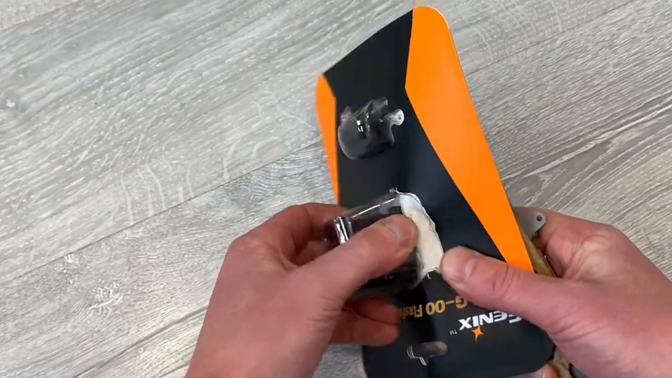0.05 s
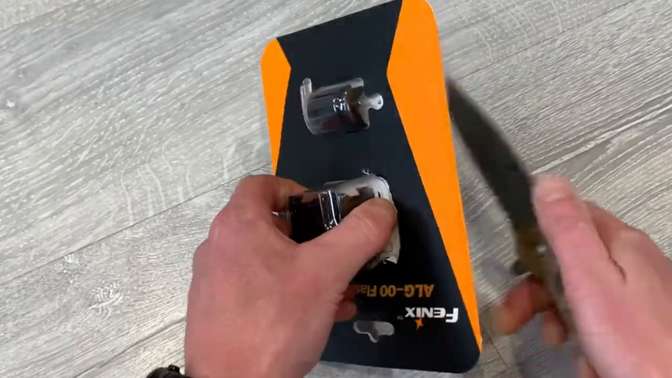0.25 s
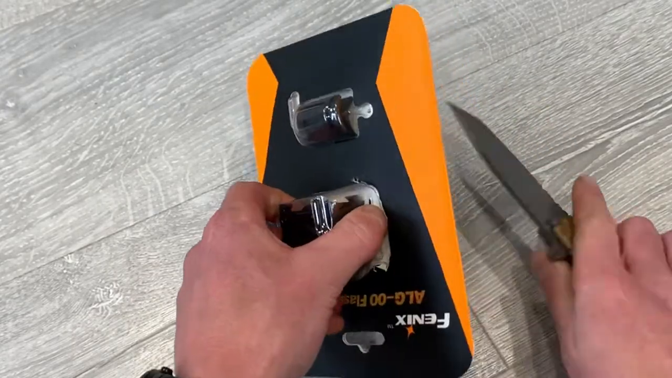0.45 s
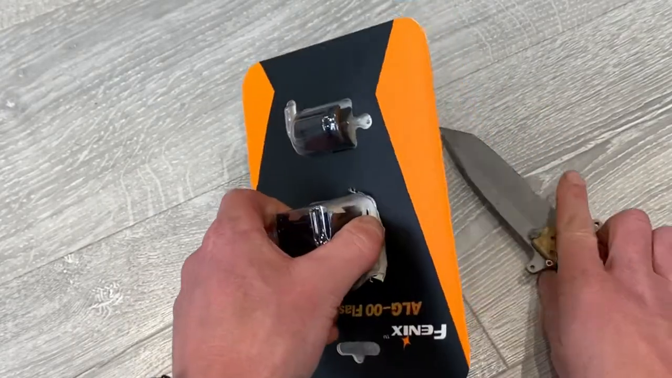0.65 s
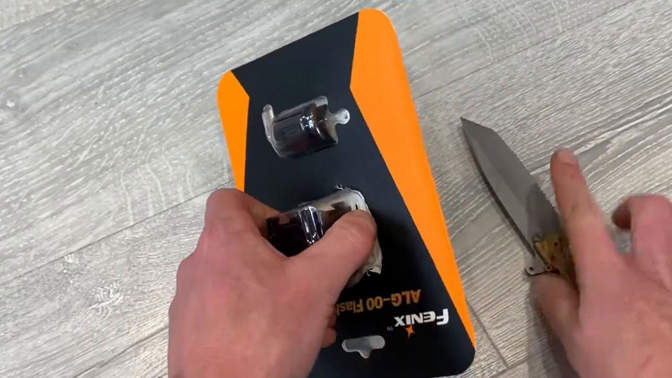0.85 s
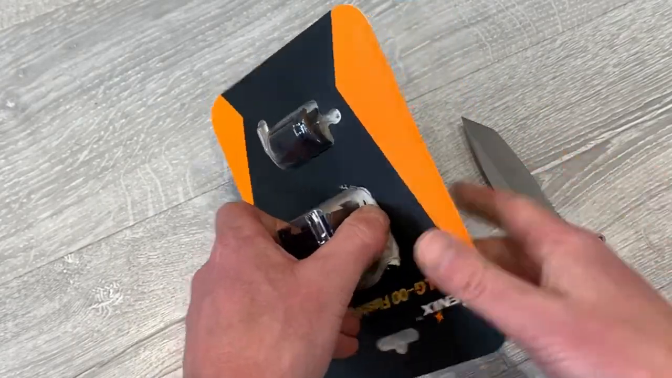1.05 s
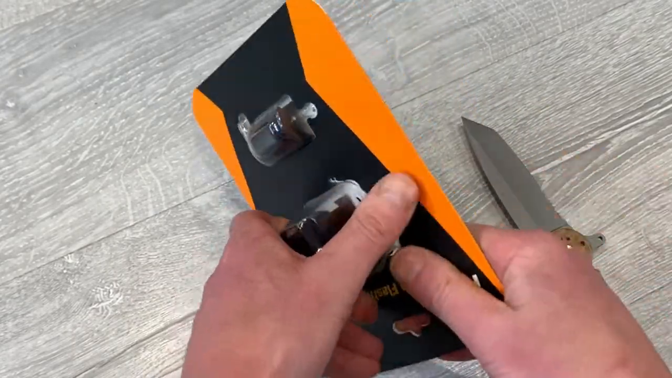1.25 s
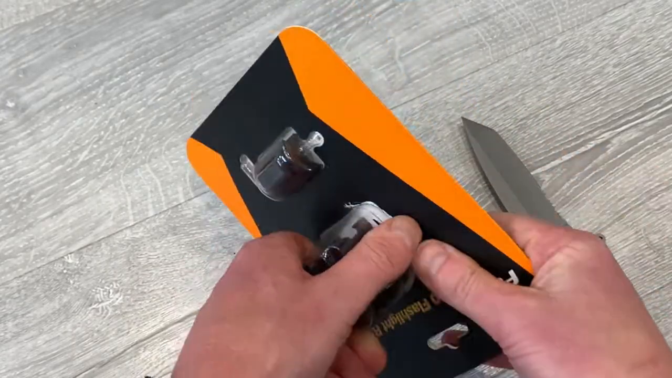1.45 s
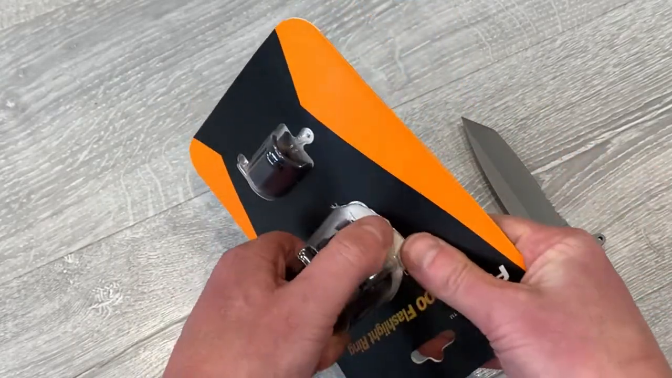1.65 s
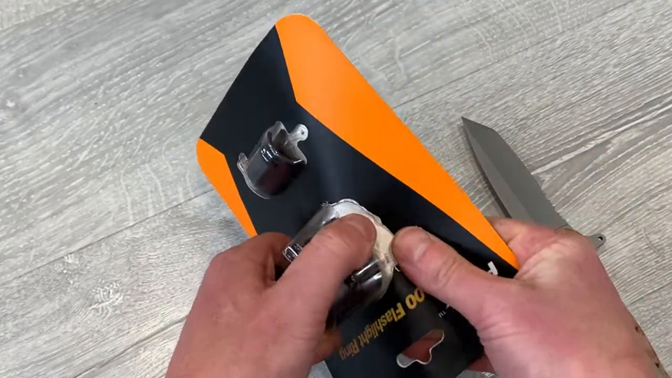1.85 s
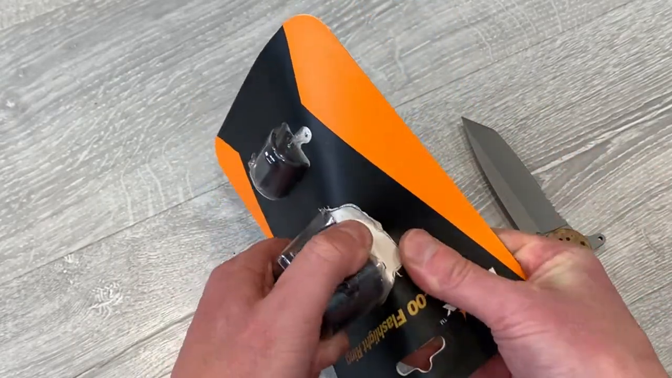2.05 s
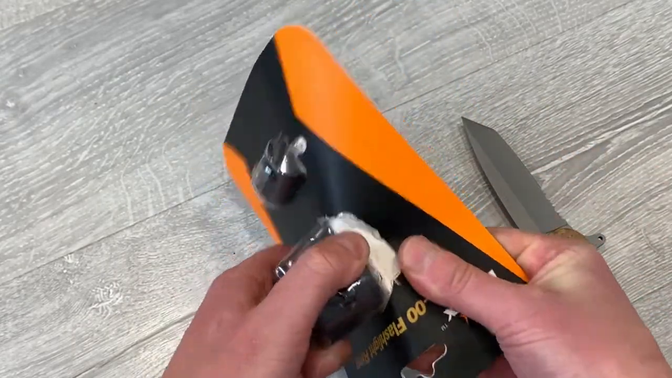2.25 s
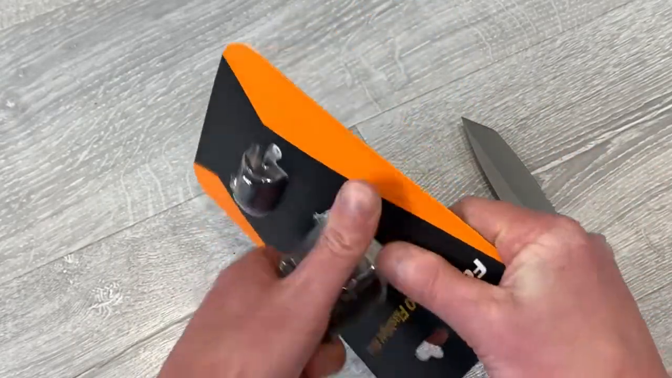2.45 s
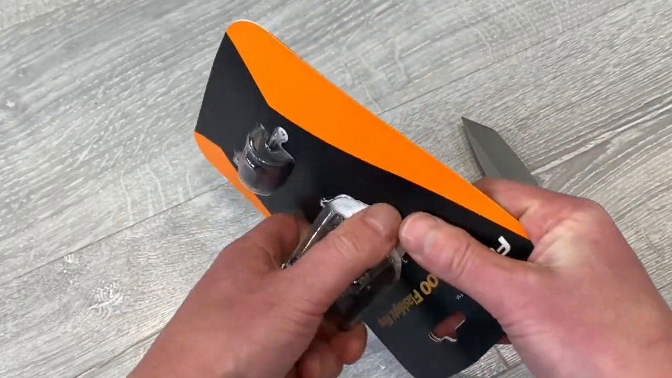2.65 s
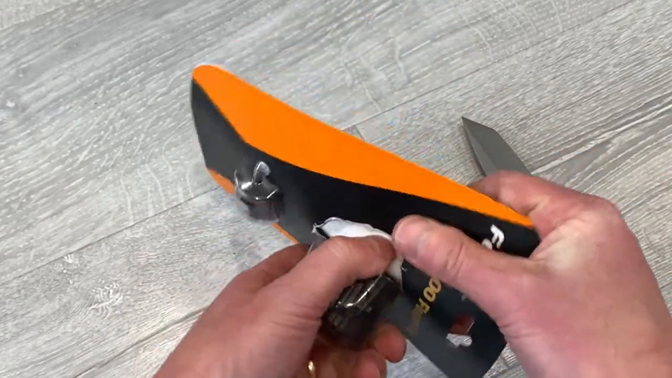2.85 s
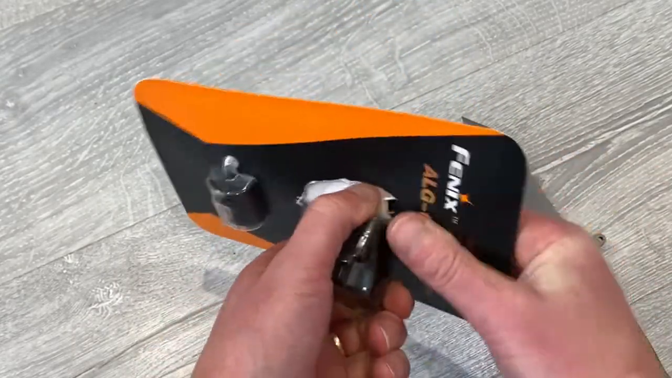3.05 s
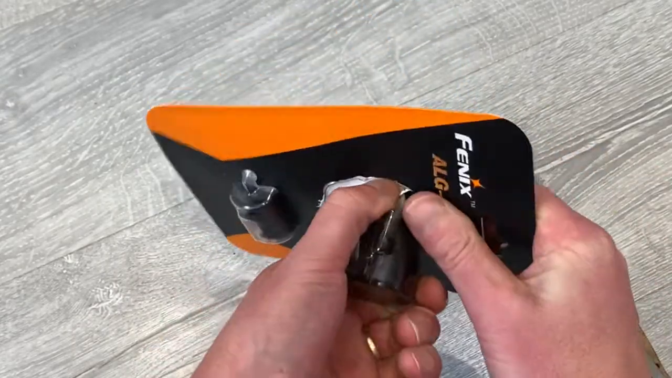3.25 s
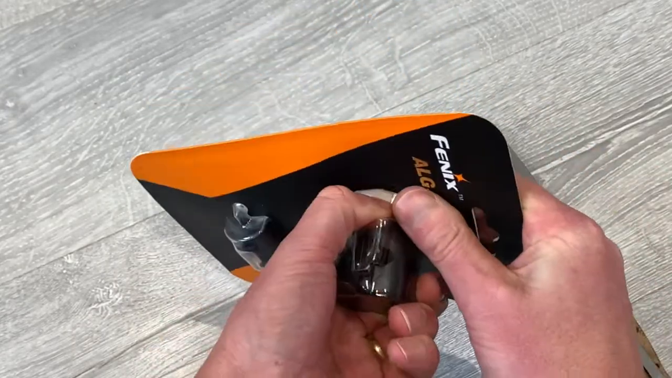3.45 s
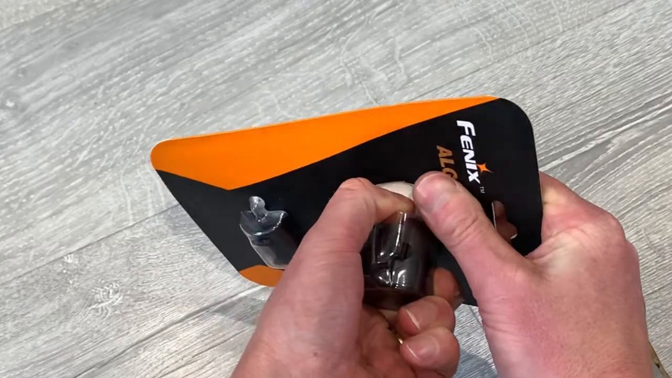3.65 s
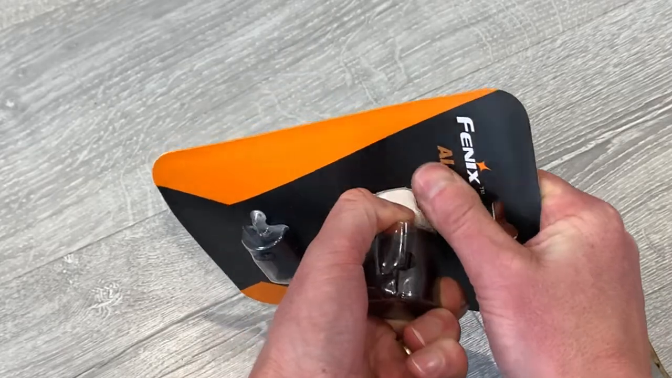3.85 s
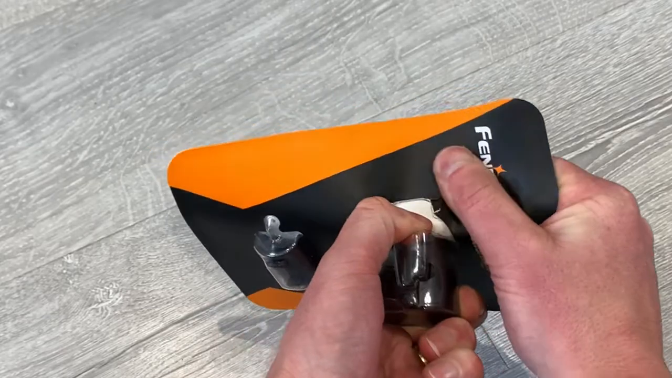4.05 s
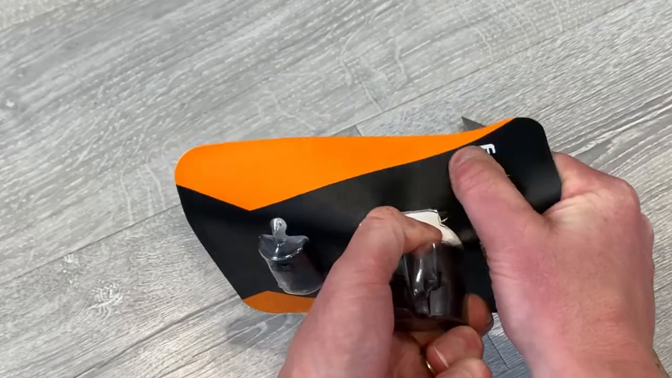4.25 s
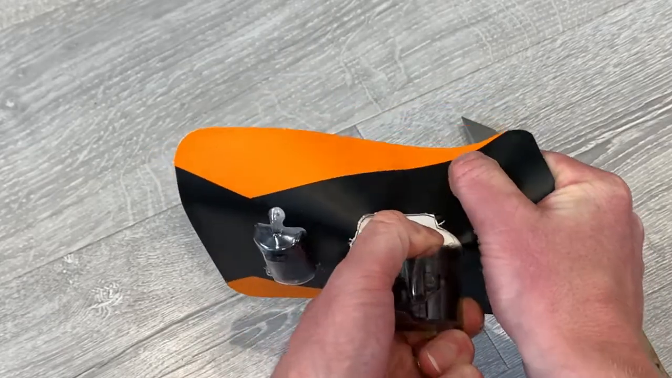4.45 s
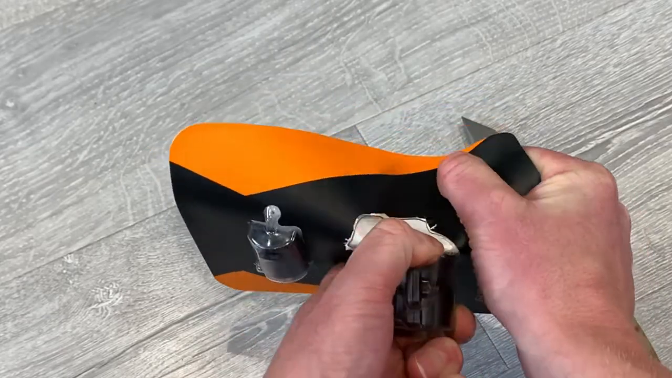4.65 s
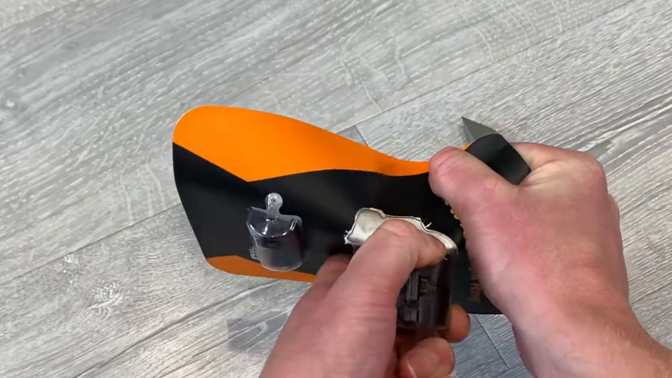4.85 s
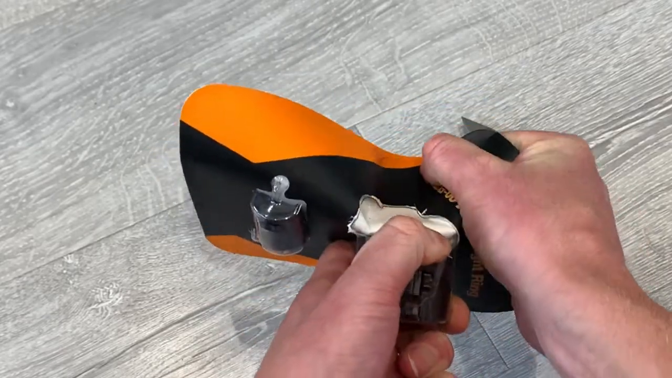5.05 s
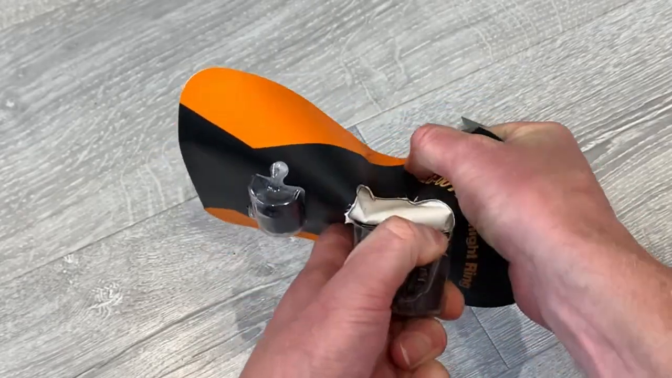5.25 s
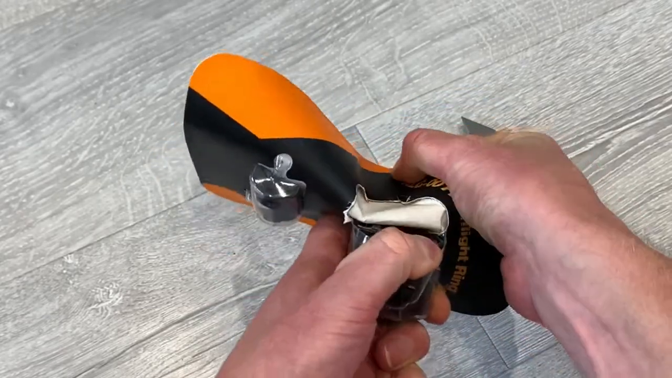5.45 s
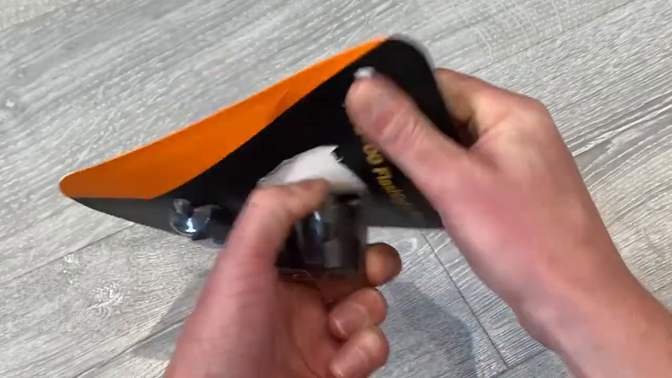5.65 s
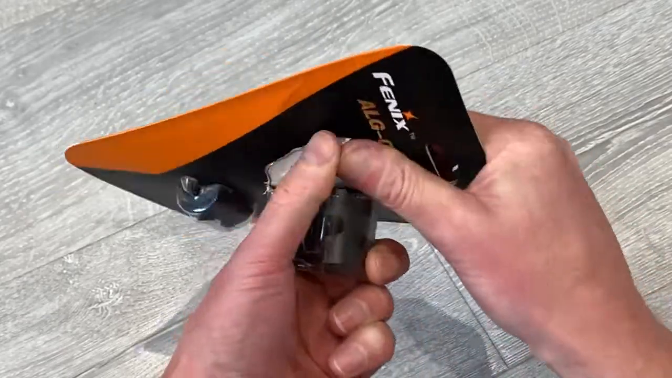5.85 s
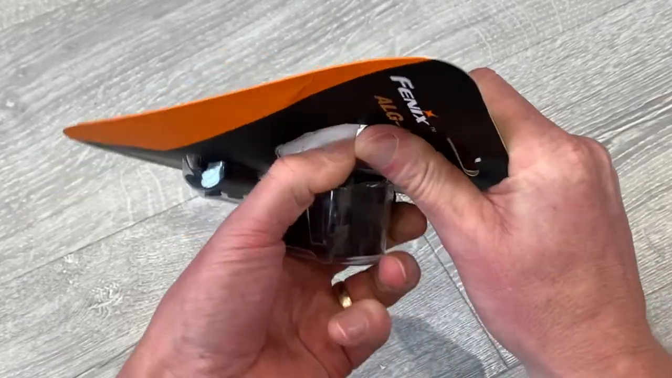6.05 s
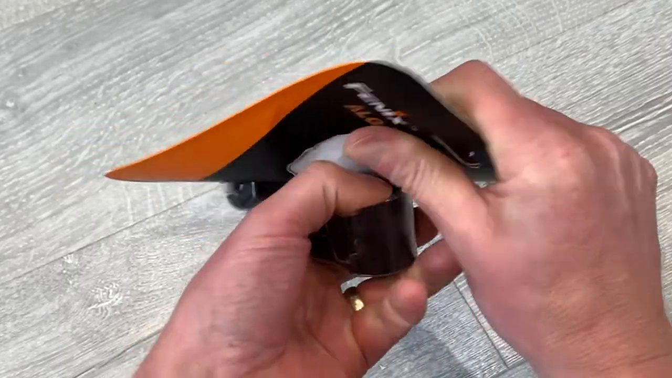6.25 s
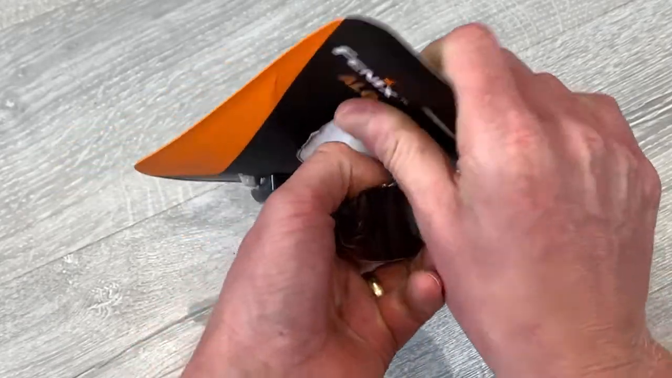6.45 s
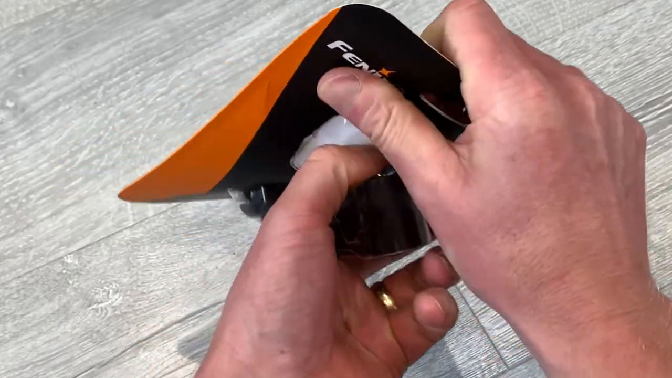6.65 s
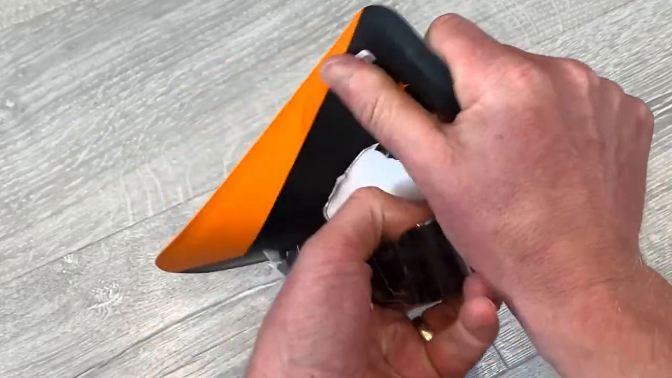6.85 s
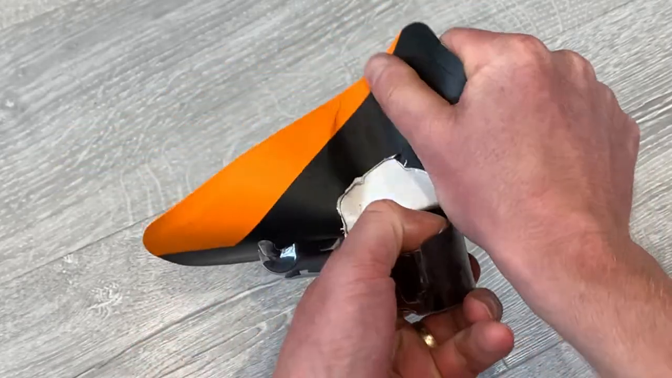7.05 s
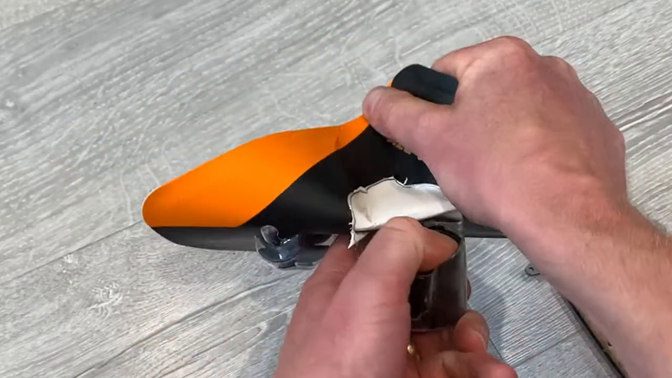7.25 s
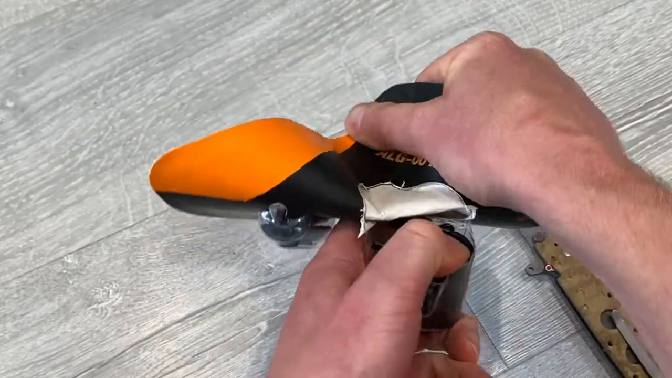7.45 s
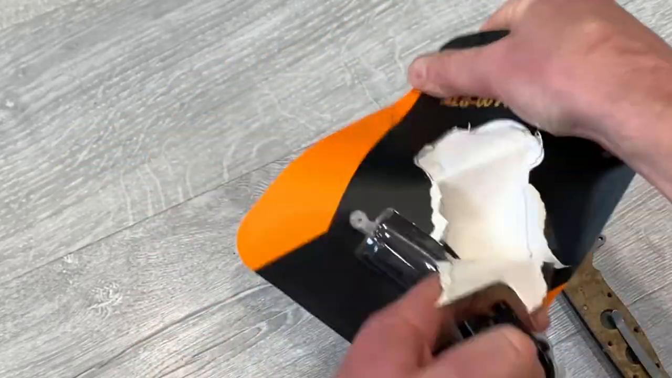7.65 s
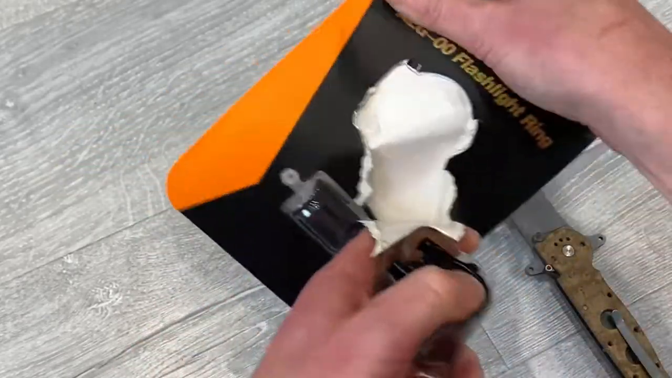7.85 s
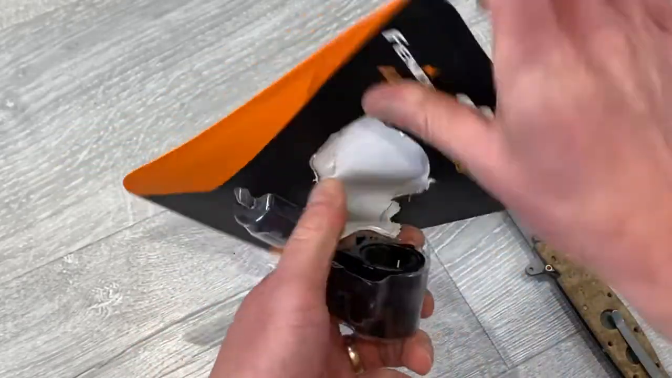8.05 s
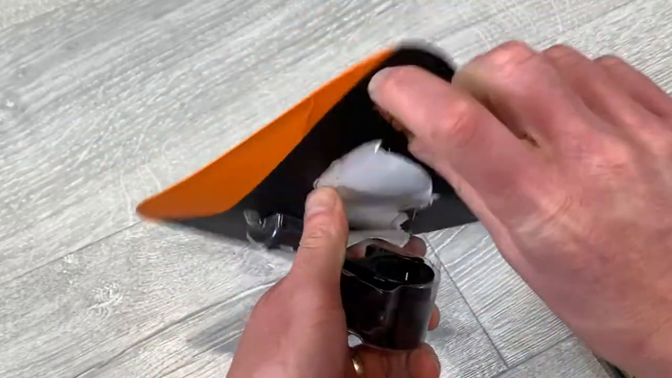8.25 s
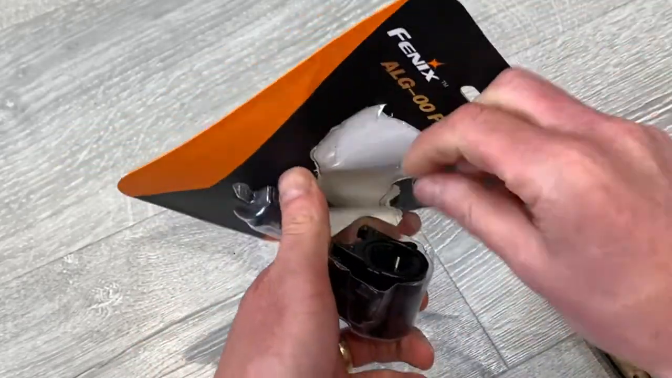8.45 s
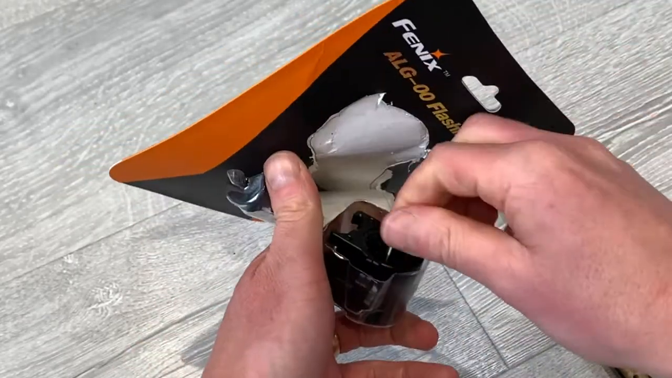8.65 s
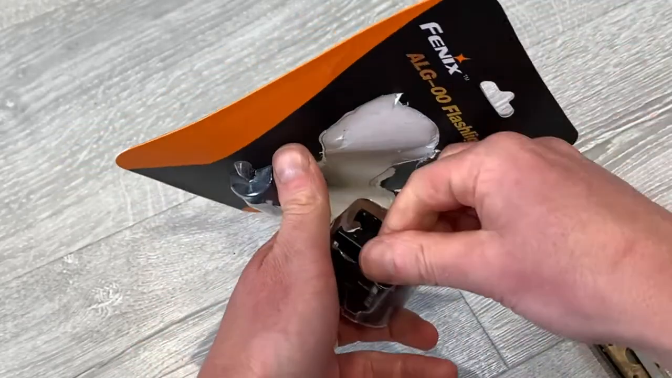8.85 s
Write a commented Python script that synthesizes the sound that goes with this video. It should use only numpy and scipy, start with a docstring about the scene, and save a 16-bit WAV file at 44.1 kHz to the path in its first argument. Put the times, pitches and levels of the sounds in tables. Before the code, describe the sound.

Close stereo microphone, small live room, quiet low air and faint wavering appliance hum. Dull finger rubbing and a light crinkle open, with a plastic snap at 0.2 s. At 0.7-0.8 s a folding knife touches a wooden floor, scuffs, drops with a hard, short clack and low thud, and rattles to rest. A bright plastic crack comes at 1.1 s, with small ticks after. From 1.7 to 2.4 s the glued seam peels in zipping ticks and fizz, ending in a loud snap at 2.3 s. Light crinkles lead to a longer, rougher tear from 3.8 to 5.6 s, with rips near 4.05, 5.3 and 5.5 s. Sparse creaks and hollow pops follow, one sharper at 6.3 s. From 6.8 to 7.7 s dense crackling and tearing peak in strong hollow snaps and a card thump at 7.55 s. Faint ticks, rubbing and soft low bumps finish by about 8.9 s.

```python
"""Two hands prise a thin plastic blister off its card: the dome snaps as it buckles, and the glued seam
sticks and slips, so that ticks ring the rim and noise shaped into breaking fibres crackles between them.
Early on, a folding knife is put down on a wooden floor: damped modes of handle and board, with dry ticks.
Fingers rub and the card thumps, as filtered noise and low modes, over room air and an appliance hum.
Decaying noise echoes form a small live room; a close two-port microphone makes the stereo."""
import sys
import numpy as np
from scipy import signal
from scipy.fft import rfft, irfft
from scipy.io import wavfile
from scipy.ndimage import uniform_filter1d

SR = 44100
rng = np.random.default_rng(int(sys.argv[2]) if len(sys.argv) > 2 else 0)


def to_wav(sig):
    """Store sig (one row per channel, or 1-D mono) as 16-bit WAV at the path in sys.argv[1].

    Samples outside -1..1 are clipped; the rate is SR.
    """
    pcm = np.clip(np.atleast_2d(sig), -1, 1) * 32767
    pcm = np.round(pcm).astype(np.int16)
    wavfile.write(sys.argv[1], SR, pcm.T)  # frames by channels


N = 392931
TIME = np.arange(N) / SR
BLOW_S = .005  # time over which the level of a short sound is reckoned

# Spectrum of a crease or tick: (frequency [Hz], relative level [dB])
CRACK_SPECTRUM = [(1200, -37), (2600, -2.5), (3200, -5), (4100, 0.5), (5500, -2.5), (7000, 0.5),
                  (9500, -0.5), (12000, -2), (14000, -8.5), (16000, -20)]
# Modes of the plastic dome: (ratio to the main mode [1], relative level [dB], t60 [s])
DOME_MODES = [(.6, -8, 0.033), (.79, -5.5, 0.036), (1, 10.5, 0.01), (1.17, 12, 0.0063), (1.42, -7.5, 0.02),
              (2.9, -6, 0.0081)]
# Modes of the knife handle: (ratio to the main mode [1], relative level [dB], t60 [s])
HANDLE_MODES = [(.64, -19.5, 0.021), (.88, -3, 0.013), (1, 2, 0.011), (1.2, 5.5, 0.0066), (1.47, 1, 0.0077),
                (1.75, -7, 0.009), (2.03, -8.5, 0.012), (2.3, -3, 0.0044), (2.9, -10, 0.0061),
                (3.45, -17, 0.0078)]
# Radiation of the thin sheet: (frequency [Hz], gain [dB])
SHEET_RADIATION = [(300, -0.5), (700, -2.5), (1000, 0.5), (1300, 1), (1480, -0.5), (1620, -3), (1780, 0),
                   (2100, -1), (16000, -0.5)]


def amp(db):
    """The decibel law: level to amplitude gain."""
    return 10 ** (np.asarray(db) / 20)


def evened(x):
    """Normalization to unit rms, so that a later gain sets the level."""
    return x / np.sqrt(np.mean(x ** 2) + 1e-20)


def read(points, hz):
    """Linear interpolation on a logarithmic frequency axis."""
    f, value = np.transpose(points)
    return np.interp(np.log(hz + 1), np.log(f + 1), value)


def curve(rows):
    """Linear interpolation in time: each column becomes one value a sample."""
    s, *columns = np.transpose(rows)
    return [np.interp(TIME, s, c) for c in columns]


def add(mix, s, sound):
    """Superposition: the sound is summed in place into the mix from time s."""
    part = mix[max(round(s * SR), 0):][:len(sound)]
    part += sound[:len(part)]


def colour(x, spectrum, size=2048):
    """Minimum-phase filtering: the response is causal, so ringing follows each click."""
    log_gain = np.log(amp(read(spectrum, abs(np.fft.fftfreq(size, 1 / SR)))))
    # The Hilbert transform of the log gain supplies the minimum phase.
    minimum_phase = np.exp(np.conj(signal.hilbert(log_gain)))
    taps = np.fft.ifft(minimum_phase).real
    return signal.fftconvolve(x, taps[:size // 2])[:len(x)]


def wander(rate_hz):
    """A slow random process: Gaussian low-pass noise of unit rms."""
    hz = np.arange(0, 3 * rate_hz, SR / N)
    spectrum = rfft(rng.standard_normal(N))[:len(hz)]
    return evened(irfft(spectrum * np.exp(-(hz / rate_hz) ** 2), N))


def blow(sound, db):
    """Energy equivalence: a short sound gets the energy of that rms level held for BLOW_S."""
    return amp(db) * sound * np.sqrt(BLOW_S * SR / (np.sum(sound ** 2) + 1e-20))


def ring(modes, hz, rise_s, scatter=0.061, size=3000):
    """Modal superposition: damped sines, each randomly detuned as where the blow lands shifts it."""
    t = np.arange(size) / SR
    ratio, db, t60 = np.transpose(modes)[:, :, None]
    detune, phase = rng.standard_normal((2, len(modes), 1))
    mode_hz = hz * ratio * (1 + scatter * detune)
    waves = amp(db - 60 * t / t60) * np.sin(2 * np.pi * mode_hz * t + phase)
    return waves.sum(0) * (1 - np.exp(-t / rise_s))


def crack(rise_s, fall_s, after_db=-22, after_s=0.0034, size=1500):
    """Impulsive excitation: a brief evenly spectral burst, then bending waves that die away."""
    t = np.arange(size) / SR
    decay = np.exp(-t / fall_s) + amp(after_db) * np.exp(-t / after_s)
    shape = (1 - np.exp(-(t / rise_s) ** 2)) * decay
    grain = np.sign(rng.standard_normal(size))
    for _ in range(2):  # flatten the spectrum, keeping only its phase, then restore the signs
        phase = np.angle(rfft(grain * shape))
        grain = np.sign(irfft(np.exp(1j * phase), size))
    return colour(grain * shape, CRACK_SPECTRUM)


def strike(clicks, place, sounds):
    """Convolution by parts: each click sets off the sound of its place."""
    out = np.zeros(N)
    for i in np.flatnonzero(clicks):
        add(out, i / SR, clicks[i] * sounds[int(place[i])])
    return out


def background(air_db=-58, side_db=-11, hum_hz=154, hum_db=-58.5, waver=0.0105):
    """Stationary noise and frequency modulation: room air and a wavering appliance hum, mid and side."""
    # Spectrum of the air: (frequency [Hz], relative level [dB])
    air_spectrum = [(20, -19), (48, -5), (100, -4), (155, 1.5), (230, -4.5), (400, -10), (650, -32),
                    (1000, -10.5), (1500, -42), (2500, -30.5), (6000, -39), (10000, -37), (16000, -58)]
    mid, side = (amp(air_db) * evened(colour(rng.standard_normal(N), air_spectrum, size=8192))
                 for _ in range(2))
    cycles = np.cumsum(hum_hz * (1 + waver * wander(7.64))) / SR
    hum = np.sqrt(2) * np.sin(2 * np.pi * cycles)
    return np.array([mid + amp(hum_db + 2 * wander(2.4)) * hum, amp(side_db) * side])


def echoes(wet_db, near_db, near_s=0.0036, build_s=0.0013):
    """Diffuse reverberation: scatter off hands and floor, then the room's tail, for mid and side."""
    # Reverberation of the room: (frequency [Hz], t60 [s])
    reverberation = [(150, 0.33), (500, 0.35), (1500, 0.36), (4500, 0.41), (9000, 0.35), (15000, 0.22)]
    t = np.arange(SR * 3 // 4) / SR
    near, taps = rng.standard_normal((2, 2, len(t)))
    near *= np.exp(-t / near_s) * (1 - np.exp(-t / 0.00023))
    hz, at, z = signal.stft(taps, SR, nperseg=256)
    decay = amp(-60 * at / read(reverberation, hz)[:, None])
    tail = signal.istft(z * decay, SR, nperseg=256)[1][:, :len(t)]
    tail *= 1 - np.exp(-(t / build_s) ** 2)
    tail = amp(wet_db) * tail / np.linalg.norm(tail[0])
    return tail + amp(near_db) * near / np.linalg.norm(near[0])


def room(x, wet_db, near_db, moves_per_s=3.1, count=3):
    """Time-varying reverberation: the pack keeps moving, so echo patterns take turns, mid and side."""
    # Gain of the side signal: (frequency [Hz], gain [dB])
    side_width = [(100, -10), (300, -6), (700, 1), (1600, 0), (3000, 2), (6000, 2), (7400, -2), (9300, -4),
                  (10500, -4), (11300, -13), (12200, -15), (13000, -5), (15000, -4)]
    turns = np.maximum(np.cos(2 * np.pi * (moves_per_s * TIME + np.arange(count)[:, None] / count)), 0)
    turns /= np.linalg.norm(turns, axis=0)  # constant total power
    mid, side = sum(signal.oaconvolve((x * turn)[None], echoes(wet_db, near_db), axes=1)[:, :N]
                    for turn in turns)
    return np.array([x + mid, colour(side, side_width)])


def wobble():
    """Low-frequency air displacement: soft gusts from the swaying bent card, as low noise."""
    # Sway of the card: (time [s], level [dB])
    sway = [(0, -76), (2.3, -61.5), (5.3, -59), (6.3, -59), (7.2, -72), (8.9, -67)]
    # Spectrum of the pushed air: (frequency [Hz], relative level [dB])
    push_spectrum = [(15, -5.5), (45, 21), (80, 8.5), (130, -2.5), (300, -66)]
    gusts = evened(colour(rng.standard_normal(N), push_spectrum, size=8192))
    return amp(curve(sway)[0]) * gusts


def grip(lump_db=3):
    """Friction noise: dull, lumpy rubbing of skin on the card."""
    # Fingers rubbing and shifting: (time [s], level [dB])
    rub_levels = [(0, -51.5), (.45, -61.5), (1.05, -57), (1.12, -48), (1.52, -64), (2.3, -55), (3.6, -57.5),
                  (4.2, -53), (6.1, -54.5), (6.3, -59), (7.3, -55.5), (7.9, -55.5), (8.2, -56),
                  (8.6, -61.5), (8.9, -52.5)]
    # Spectrum of the rubbing: (frequency [Hz], relative level [dB])
    rub_spectrum = [(20, -12.5), (60, 9), (110, 2.5), (200, 9.5), (330, 0), (600, 0), (850, 2.5),
                    (1500, -3.5), (4000, -67)]
    rubbing = rng.standard_normal(N) * amp(lump_db * wander(50))
    return amp(curve(rub_levels)[0]) * evened(colour(rubbing, rub_spectrum))


def skid(at_s=.744, level_db=-33, size=540):
    """Friction-driven resonance: the handle slides off the fingers and scuffs the floor before it drops."""
    out = np.zeros(N)
    scuff = np.linspace(0, 1, size) * rng.standard_normal(size)
    handle = ring(HANDLE_MODES, hz=1300, rise_s=0.00038, size=300)
    add(out, at_s, amp(level_db) * evened(signal.fftconvolve(scuff, handle)))
    return out


def knife(tick_trim_db=-1, clack_trim_db=-1):
    """Impact excitation of coupled bodies: steel ticks, the handle clacks, the floor board answers."""
    # The knife touches down, drops flat and rattles to rest: (time [s], tick level before trim [dB],
    # clack level before trim [dB], nominal clack pitch [Hz], thud level [dB], nominal thud pitch [Hz])
    impacts = [(.6778, -29, -31, 1190, -20, 679), (.714, -38, -33, 1000, -29, 680),
               (.7237, -37, -26.5, 1080, -18, 533), (.7315, -45, -35, 1100, -30.5, 480),
               (.7563, -31.5, -9, 1270, -17, 548), (.7608, -47, -27, 1410, -20, 638),
               (.7665, -46, -19.5, 1330, -24, 600), (.7745, -47, -27, 1150, -25.5, 633),
               (.7842, -44, -27, 990, -22, 600), (.801, -53, -29.5, 950, -34.5, 522),
               (.815, -53, -33, 900, -32.5, 575), (.829, -56, -37, 850, -40, 697)]
    # Modes of the floor board: (ratio to the main mode [1], relative level [dB], t60 [s])
    board_modes = [(.5, -17, 0.011), (.78, -6, 0.008), (.9, -13.5, 0.083), (1, 4, 0.016), (1.3, -1, 0.013),
                   (1.5, -16, 0.065)]
    out = np.zeros(N)
    for s, tick, clack, clack_hz, thud, thud_hz in impacts:
        add(out, s, blow(crack(rise_s=0.0018, fall_s=0.0018), tick + tick_trim_db))
        handle = ring(HANDLE_MODES, clack_hz, rise_s=0.00031, scatter=0.024)
        add(out, s, blow(handle, clack + clack_trim_db))
        add(out, s, blow(ring(board_modes, thud_hz, rise_s=0.0023, scatter=0.051), thud))
    return out


def thumps(trim_db=-3.0, middle_hz=480, linger=0.93):
    """Flexural resonance: the whole card flaps with a soft boom; the lower, the longer it rings."""
    # The card springs back or is bumped: (time [s], level before trim [dB], nominal pitch [Hz])
    bumps = [(.185, -38, 560), (1.129, -34.5, 514), (2.337, -33.5, 600), (2.507, -40, 378),
             (7.117, -39.5, 392), (7.17, -34.5, 425), (7.367, -38.5, 361.3), (7.547, -19.5, 443),
             (7.554, -29, 342), (7.581, -34, 344), (7.598, -22, 493), (7.602, -32, 300), (7.611, -34, 326),
             (7.616, -41, 140), (7.66, -37, 530), (7.748, -38, 378), (8.073, -38, 192), (8.12, -41, 130),
             (8.181, -42.5, 283), (8.202, -42, 186), (8.228, -42, 200), (8.259, -42, 340),
             (8.276, -46, 300), (8.334, -37.5, 173), (8.403, -45, 319.5), (8.407, -34.5, 183)]
    # Modes of the card: (ratio to the main mode [1], relative level [dB], t60 at middle_hz [s])
    card_modes = [(.66, -6, 0.016), (1, 4, 0.022), (1.35, -2.5, 0.019), (1.75, -4, 0.011),
                  (2.3, -3.5, 0.016)]
    out = np.zeros(N)
    for s, db, hz in bumps:
        modes = np.array(card_modes) * [1, 1, (middle_hz / hz) ** linger]
        add(out, s, blow(ring(modes, hz, rise_s=0.0059, scatter=0.032), db + trim_db))
    return out


def tearing(attack_s=0.0086, release_s=0.01, sag_db_per_s=-6.5):
    """Addition of powers: strengths of fizz and card from pulls, quick runs, crinkles and a held bend."""
    # Held bent, the pack keeps crinkling: (start [s], end [s], relative fizz [dB], relative card [dB])
    hold = (3, 8, -58.5, -57)
    # Three long pulls peel the card: (time [s], relative fizz of breaking fibres [dB],
    # relative shaking of card and dome [dB])
    pulls = [
        [(1.68, -54, -67), (1.7, -61, -68), (1.71, -42.5, -48), (1.8, -41, -48), (1.99, -38, -52),
         (2.09, -35, -43), (2.2, -52, -59.5), (2.25, -30, -41), (2.35, -44, -49), (2.45, -52, -44)],
        [(3.83, -40, -46.5), (4.03, -28.5, -34.5), (4.38, -43.5, -40.5), (4.62, -39.5, -45.5), (4.75, -45, -46),
         (4.92, -38.5, -43.5), (5.06, -44, -44), (5.26, -33.5, -35.5), (5.42, -45.5, -60), (5.66, -55, -52)],
        [(6.76, -45, -52), (6.86, -42, -39), (7.1, -37.5, -36.5), (7.29, -30.5, -30), (7.35, -44.5, -43),
         (7.41, -28.5, -32.5), (7.62, -37, -35.5), (7.69, -44.5, -40.5), (7.78, -40.5, -42), (7.9, -64, -68)],
    ]
    # The seam gives way in a quick run: (time of the height [s], Gaussian width [s],
    # relative fizz [dB], relative card [dB])
    rips = [(2.109, 0.022, -28, -41.5), (4.052, 0.029, -25, -38), (5.328, 0.023, -25, -25.5),
            (5.517, 0.029, -28.5, -29), (7.599, 0.018, -24.5, -30)]
    # The pack creaks and crinkles as the hands bend it: (start [s], length before release [s],
    # relative fizz [dB], relative card [dB])
    crinkles = [(0, 0.029, -43.5, -50), (0.095, 0.09, -52.5, -53), (1.095, 0.096, -50, -39),
                (1.256, 0.13, -51, -66), (1.456, 0.033, -50.5, -49), (2.469, 0.25, -50.5, -52.5),
                (2.782, 0.073, -51, -50), (2.927, 0.23, -48, -52), (2.939, 0.062, -50, -50),
                (3.237, 0.11, -44, -50), (3.564, 0.16, -44, -53), (5.724, 0.12, -52.5, -47),
                (5.95, 0.08, -49.5, -52), (6.111, 0.089, -51, -59), (6.366, 0.15, -50, -53.5),
                (6.588, 0.14, -51, -50), (7.934, 0.033, -63, -61), (8.053, 0.24, -56.5, -58),
                (8.325, 0.17, -61, -59.5), (8.574, 0.46, -62.5, -57.5)]
    start, end, *db = hold
    power = amp(db)[:, None] ** 2 * ((TIME > start) & (TIME < end))
    for pull in pulls:
        during = (TIME >= pull[0][0]) * (TIME <= pull[-1][0])
        power += amp(curve(pull)) ** 2 * during
    for s, width, *db in rips:
        power += (amp(db)[:, None] * np.exp(-.5 * ((TIME - s) / width) ** 2)) ** 2
    t = np.arange(SR) / SR
    for start, length, *db in crinkles:
        release = np.exp(-np.maximum(t - length, 0) / release_s)
        shape = np.minimum(t / attack_s, 1) * amp(sag_db_per_s * t) * release
        for layer, gain in zip(power, amp(db)):
            add(layer, start, (gain * shape) ** 2)
    return np.sqrt(power)


def keen(x, edge_hz=6500):
    """High-shelf filtering: the treble rises or falls with the tension in the seam."""
    # Treble of the tearing: (time [s], gain [dB])
    treble_gain = [(0, -2), (2.2, -7), (3.0, -1), (3.7, -4.5), (5.2, 6), (6.3, 2), (7.3, 3), (8.0, -3),
                   (8.9, -2)]
    top = signal.sosfiltfilt(signal.butter(2, edge_hz, "high", fs=SR, output="sos"), x)
    return x + (amp(curve(treble_gain)[0]) - 1) * top


def flex(x, depth_db=2.5, size=(9, 36)):
    """Resonance drift: as the card bends, broad patches of spectral colour come and go."""
    z = signal.stft(x, SR, nperseg=256)[2]
    patches = rng.standard_normal(z.shape)
    for axis in (0, 1):  # smooth over frequency, then over time
        for _ in range(2):
            patches = uniform_filter1d(patches, size[axis] // 2, axis)
    return signal.istft(z * amp(depth_db * evened(patches)), SR, nperseg=256)[1][:N]


def fibres(per_s, spread_db, scrape, grain_s):
    """Shot noise: the amplitude envelope of tiny uneven breaks over a fine scrape."""
    size = amp(spread_db * np.minimum(rng.exponential(1, N), 3))
    breaks = size * (rng.random(N) < per_s / SR)
    energy = signal.lfilter([1], [1, -np.exp(-1 / (grain_s * SR))], breaks ** 2)
    return np.sqrt(energy / energy.mean() + scrape ** 2)


def slips(jitter):
    """Stick-slip motion: one jerk per slip; slow jerks are larger, uneven ones differ more in size."""
    # The glued seam lets go like a zip: (time [s], nominal slip rate [1/s])
    slip_rate = [(1.71, 287), (1.76, 62), (1.82, 137), (2.05, 81), (2.1, 121), (2.15, 73), (2.26, 284),
                 (3.8, 148), (4.055, 197), (4.08, 98), (4.85, 134), (5.24, 188), (5.33, 420), (5.44, 172),
                 (5.52, 252), (5.8, 115), (6.8, 134), (7.6, 150)]
    rate = curve(slip_rate)[0]
    turns = np.cumsum(rate * np.maximum(1 + jitter * wander(70), 0)) / SR
    size_db = (1.5 + 7 * jitter) * np.tanh(wander(200))
    lets_go = np.diff(np.floor(turns), prepend=0) > 0
    return lets_go * amp(size_db) / np.sqrt(rate)


def zip_ticks(jerks, moves_per_s=1.1, count=12):
    """Periodic impulsive excitation: dry ticks, alike nearby, that change as the tear moves on."""
    place = np.floor(count * moves_per_s * TIME + 4 * rng.random(N)) % count
    ticks = [blow(crack(rise_s=.0005, fall_s=.0005), 0) for _ in range(count)]
    return evened(strike(jerks, place, ticks))


def sing(x, width_hz=550):
    """A moving resonance: the freed flap lifts a narrow band of the ticks."""
    # Song of the flap, moving with the tear: (time [s], pitch [Hz], lift [dB])
    flap_pitch = [(1.7, 3340, 4), (1.95, 3290, -10.5), (2.11, 3070, 7), (2.4, 3230, -18), (3.3, 4470, -3),
                  (3.8, 3560, 13), (4.1, 3480, -1), (4.45, 4540, -8.5), (4.65, 5860, -3.5),
                  (5.2, 4100, -16), (5.33, 2920, 4), (5.42, 5380, -9), (5.52, 3280, -9.5), (6.0, 3850, 9.5),
                  (6.8, 4500, -10), (7.1, 4200, -1), (7.2, 2700, -7), (7.4, 4430, -10), (7.6, 5700, -7)]
    hz, lift_db = curve(flap_pitch)
    # Shift the pitch down to zero, low-pass, and shift it back up.
    turn = np.exp(2j * np.pi * np.cumsum(hz) / SR)
    r = np.exp(-np.pi * width_hz / SR)
    band = 2 * (turn * signal.lfilter([1 - r], [1, -r], x / turn)).real
    return evened(x + amp(lift_db) * band)


def dome_rattle(jerks, detune=0.05, count=28):
    """Modal excitation by stick-slip: each jerk rings the rim, at a pitch that strays along the tear."""
    # The rim rings higher or lower as it is bent: (time [s], nominal pitch [Hz])
    rim_pitch = [(1.7, 1605), (1.9, 1590), (2.1, 1120), (2.25, 1388), (3.0, 1527), (3.3, 1249), (3.9, 1693),
                 (4.6, 1730), (5.3, 1897), (5.52, 1830), (5.8, 1288), (6.6, 1600), (7.0, 1602), (7.5, 1649)]
    # Modes of the taut glued rim: (ratio to the main mode [1], relative level [dB], t60 [s])
    rim_modes = [(.64, -9, .02), (1, 5, 0.013), (1.15, 5, 0.0098), (1.45, -1, .008)]
    pitches = np.geomspace(1000, 2300, count)
    wanted = curve(rim_pitch)[0] * (1 + detune * wander(70))
    rings = [blow(ring(rim_modes, hz, rise_s=0.0002, scatter=0.022, size=1000), 0) for hz in pitches]
    place = np.rint(np.interp(wanted, pitches, np.arange(count)))  # nearest ready-made ring
    return evened(colour(strike(jerks, place, rings), SHEET_RADIATION))


def peel(strength, clump_db=2.5, fizz_trim_db=-4.0, card_trim_db=-4.5):
    """Stick-slip and fracture: ticks ring the dome; between them clumps of fibres break, shaking the card."""
    # The seam gives evenly at first, at last in uneven jerks; each row holds until the next: (start [s],
    # unevenness of slips [0-1], power share of slips in fizz [0-1], power share of the dome [0-1])
    seam = [(0, .1, .96, .92), (2.2, .45, .5, .45), (2.4, .45, .8, .8), (3.8, .35, .9, .74),
            (4.15, .6, .88, .74), (5.65, .2, .9, .8), (6.7, .5, .86, .76)]
    # Spectrum of breaking fibres: (frequency [Hz], relative level [dB])
    fizz_spectrum = [(1200, -30), (2300, 2.5), (3000, 6), (4100, 2.5), (5300, 1.5), (7500, -10),
                     (11000, 11.5), (12300, 5), (14000, 4), (15800, -19)]
    # Spectrum of the shaken card: (frequency [Hz], relative level [dB])
    card_spectrum = [(250, -22), (550, -10), (850, -7.5), (1050, 0.5), (1250, -4.5), (1700, -1.5),
                     (2250, -1.5), (2550, -4.5), (3200, -5), (6000, -28.5)]
    fine = fibres(per_s=1500, spread_db=3.5, scrape=0.56, grain_s=0.00013) * amp(clump_db * wander(110))
    starts, *columns = np.transpose(seam)
    jitter, share, hollow = np.array(columns)[:, np.searchsorted(starts[1:], TIME)]
    jerks = slips(jitter)
    fizz, card = (evened(colour(fine * np.sign(rng.standard_normal(N)), spectrum))
                  for spectrum in (fizz_spectrum, card_spectrum))
    fizz = np.sqrt(1 - share) * fizz + np.sqrt(share) * sing(zip_ticks(jerks))
    card = np.sqrt(1 - hollow) * card + np.sqrt(hollow) * dome_rattle(jerks)
    fizz = strength[0] * amp(fizz_trim_db) * fizz
    card = strength[1] * amp(card_trim_db) * card
    return flex(fizz + card, depth_db=1.5)


def bundles(strength, from_s=4.1, cap_db=-36, trim_db=-3, count=20):
    """Random fracture: as the tear bites into the card, bundles of fibres snap, each with its own pitch."""
    # Modes of a bundle: (ratio to the main mode [1], relative level [dB], t60 [s])
    bundle_modes = [(.62, -2.5, 0.0049), (1, -7.5, 0.0078), (1.45, -1, .004)]
    happens = (rng.random(N) < 75 / SR) & (TIME > from_s)  # 75 a second on average
    size = np.minimum(strength, amp(cap_db)) * amp(rng.uniform(-7, 4, N))
    sounds = [blow(ring(bundle_modes, hz, rise_s=0.00034, size=600), trim_db)
              for hz in np.geomspace(2400, 10000, count)]
    return strike(happens * size, rng.integers(0, count, N), sounds)


def creases(strength, per_s=22, crowding=.5, busy_db=-41, crack_trim_db=-1.0, spread_db=5.5,
            dome_hz=1644, detune=0.29, count=8):
    """Random buckling: small snaps anywhere on the dome, more and louder under strain up to busy_db."""
    fizz, card = np.minimum(strength, amp(busy_db))
    happens = rng.random(N) < per_s * (fizz / amp(busy_db)) ** crowding / SR
    place, luck = rng.integers(0, count, N), 2 * rng.random((2, N)) - 1
    sharp, hollow = happens * np.array([fizz, card]) * amp(spread_db * luck)
    cracks = [blow(crack(rise_s=0.00035, fall_s=0.00039), crack_trim_db) for _ in range(count)]
    pitches = dome_hz * (1 + detune * np.linspace(-1, 1, count))
    rings = [blow(ring(DOME_MODES, hz, rise_s=0.00027, size=1000), 0) for hz in pitches]
    return colour(strike(sharp, place, cracks) + strike(hollow, place, rings), SHEET_RADIATION)


def snaps(ring_trim_db=-1, strain_db=-20, strain_s=0.025, big_db=-18, growth=0.37, size=500):
    """Elastic instability: the sheet strains, then buckles in a bright crack and a hollow ring of the dome."""
    # The blister buckles or the glued seam gives: (time [s], crack level before radiation [dB],
    # ring level before trim and radiation [dB], nominal ring pitch [Hz])
    buckles = [(.179, -22.5, -32.5, 1756), (.186, -26.5, -29.5, 1620), (1.025, -50.5, -58, 1547),
               (1.079, -45, -48, 1537), (1.095, -33, -33, 1580), (1.126, -17, -18, 1610),
               (1.212, -39.5, -23.5, 1550), (1.217, -47, -37.5, 1660), (1.31, -52, -36, 1440),
               (1.329, -41.5, -37, 1580), (1.339, -50, -39.5, 1393), (1.444, -36.5, -36.5, 1520),
               (1.707, -47, -49, 1620), (1.922, -40, -55, 1590), (2.06, -35, -49, 1580),
               (2.116, -32, -41, 1150), (2.166, -28, -36, 1350), (2.3193, -13, -21.5, 1590),
               (2.376, -47, -32.5, 1560), (2.484, -45.5, -31, 1380), (2.577, -41.5, -50, 2557),
               (2.779, -49.5, -46, 1613), (2.826, -38.5, -66, 2390), (2.919, -36.5, -53, 1745),
               (3.002, -46, -49, 1670), (3.03, -41, -50, 1640), (3.047, -52, -39, 1400),
               (3.059, -60, -40, 1180), (3.097, -40.5, -60, 1513), (3.138, -43, -38.5, 1300),
               (3.224, -40, -51, 1568), (3.243, -44, -56, 1577), (3.451, -47.5, -62, 1692),
               (3.534, -37.5, -42, 2100), (3.564, -30, -41, 1800), (3.617, -26.5, -38, 1740),
               (3.639, -26, -39, 1406), (3.8289, -20, -30, 1350), (3.951, -30, -33.5, 1409),
               (4.186, -30, -36, 1810), (4.219, -30.5, -32, 1748), (4.258, -29.5, -42, 1690),
               (4.327, -37, -46, 1820), (4.422, -34, -31.5, 1871), (4.473, -35, -32.5, 1800),
               (4.561, -41, -42, 1806), (4.59, -35.5, -35, 1760), (4.607, -41, -36, 1750),
               (4.647, -35, -36, 1830), (4.699, -36.5, -46, 1784), (4.739, -32.5, -32.5, 1203),
               (4.764, -31, -54, 1858), (4.777, -29.5, -44, 1940), (4.844, -38, -55, 1801),
               (4.886, -34.5, -47, 1800), (4.916, -30.5, -42, 1980), (5.049, -41, -37, 1850),
               (5.071, -32.5, -35, 2172), (5.178, -32.5, -38, 1870), (5.187, -40, -48, 1893),
               (5.224, -50, -46, 1811), (5.235, -49, -38, 1800), (5.41, -37.5, -42, 1800),
               (5.455, -34, -33.5, 2060), (5.469, -36, -35, 1270), (5.71, -53, -33, 1331),
               (5.759, -56, -40.5, 1840), (5.794, -54, -41, 1320), (5.952, -47, -33.5, 1500),
               (5.965, -61, -42, 1170), (6.021, -42.5, -59, 1646), (6.05, -51, -45, 1398),
               (6.101, -50, -28, 1690), (6.151, -35.5, -26.5, 1673), (6.25, -51, -42.5, 1394),
               (6.331, -23, -23.5, 1852), (6.483, -45, -57, 2106), (6.684, -50, -38.5, 1814),
               (6.742, -43.5, -43, 1850), (6.934, -32, -30, 1720), (6.955, -38, -43, 1650),
               (6.973, -33.5, -28, 1651), (6.984, -35, -31, 1589), (7.026, -28, -31, 1759),
               (7.044, -42, -32, 1601), (7.071, -30, -27.5, 1688), (7.112, -27.5, -37, 1570),
               (7.117, -27, -23.5, 1700), (7.141, -33, -38, 1830), (7.167, -23, -32, 1940),
               (7.192, -29, -36, 1887), (7.207, -26.5, -26.5, 1900), (7.233, -29.5, -29, 1650),
               (7.265, -28, -25, 1700), (7.288, -38, -38, 1751), (7.292, -23.5, -39, 1730),
               (7.301, -34, -37, 1550), (7.318, -33, -47, 1605), (7.364, -19, -21.5, 1700),
               (7.378, -32, -29.5, 1600), (7.432, -30, -27.5, 1620), (7.446, -26, -30, 1600),
               (7.459, -20, -21, 1590), (7.489, -22.5, -26, 1660), (7.546, -15.5, -16.5, 1724),
               (7.554, -18, -12.5, 1670), (7.638, -25, -39, 1580), (7.654, -28, -50, 1526),
               (7.667, -25, -45, 1800), (7.956, -43, -39.5, 1730), (7.963, -47, -43, 1683),
               (8.042, -67, -44.5, 1820), (8.047, -58, -39, 1850), (8.069, -43, -40, 987),
               (8.161, -55, -51, 1766), (8.173, -58, -38.5, 1890), (8.242, -41.5, -49, 1998),
               (8.277, -49, -52, 1790), (8.333, -51, -51, 1800), (8.405, -42, -49, 1810),
               (8.494, -59, -45.5, 1923), (8.52, -68, -49, 1900), (8.617, -62, -46.5, 1000),
               (8.654, -65, -44, 1950), (8.663, -70, -37.5, 1886), (8.782, -45.5, -41.5, 1730),
               (8.791, -53, -47, 1820), (8.701, -51, -39, 1795), (8.825, -50, -37.5, 1660),
               (8.84, -47, -35, 1810)]
    out = np.zeros(N)
    swell = np.exp((np.arange(size) - size) / SR / strain_s)
    for s, sharp, hollow, hz in buckles:
        span = amp(growth * (sharp - big_db))  # a small crease is over sooner
        strain = colour(swell * rng.standard_normal(size), CRACK_SPECTRUM)
        add(out, s - size / SR, blow(strain, sharp + strain_db))
        add(out, s + 0.00022, blow(crack(rise_s=0.00067 * span, fall_s=0.00071 * span), sharp))
        dome = ring(DOME_MODES, hz, rise_s=0.00022, scatter=0.055)
        add(out, s + 0.00022, blow(dome, hollow + ring_trim_db))
    return colour(out, SHEET_RADIATION)


def scene():
    """Superposition in one room: all sources sum as mid and side, which become left and right."""
    # Small objects radiate little bass: (frequency [Hz], gain [dB])
    bass_loss = [(40, -18), (130, -12), (330, -2.5), (16000, -3.5)]
    strength = tearing()
    knife_in_room = room(colour(knife() + skid(), bass_loss), wet_db=-4.5, near_db=-8)
    air = background()
    seam_sound = keen(peel(strength) + bundles(strength[0]))
    seam_in_room = room(seam_sound + grip(), wet_db=-5.0, near_db=-10.0)
    dome_sound = keen(creases(strength) + snaps())
    dome_in_room = room(dome_sound + thumps(), wet_db=-7.5, near_db=-5.5)
    mid, side = knife_in_room + air + seam_in_room + dome_in_room
    mid = mid + wobble()
    return np.array([mid + side, mid - side])


def record(dry):
    """Interaural-style phase and level difference: high treble leads at the right port; then a band limit."""
    # Level difference of the ports: (frequency [Hz], excess of the right port [dB])
    port_tilt = [(100, 2), (500, .8), (2000, .6), (5000, 2.5), (7000, 0), (16000, 0)]
    # Phase difference of the ports: (frequency [Hz], lead of the right port [rad])
    port_lead = [(0, 0), (2000, 0), (3200, -.8), (4600, -.2), (5900, 1.4), (6900, 2.9), (7600, 3.5),
                 (9000, 6.1), (10000, 6.9), (11200, 9.0), (12200, 9.8), (13300, 12.4), (14800, 12.8),
                 (16000, 15.7)]
    hz = np.fft.rfftfreq(N, 1 / SR)
    lean = amp(read(port_tilt, hz) / 2)
    lead = np.exp(1j * np.interp(hz, *np.transpose(port_lead)))
    pair = irfft(rfft(dry) * np.array([1 / lean, lean * lead]), N)
    band_limit = signal.firwin(255, 15900, window=("kaiser", 9), fs=SR)  # low-pass edge in Hz
    return signal.oaconvolve(pair, band_limit[None], "same", axes=1)


dry = scene()
out = record(dry)
to_wav(out)
```